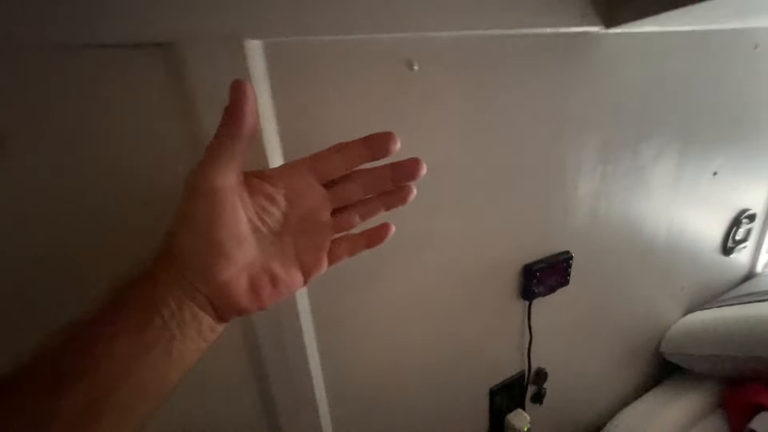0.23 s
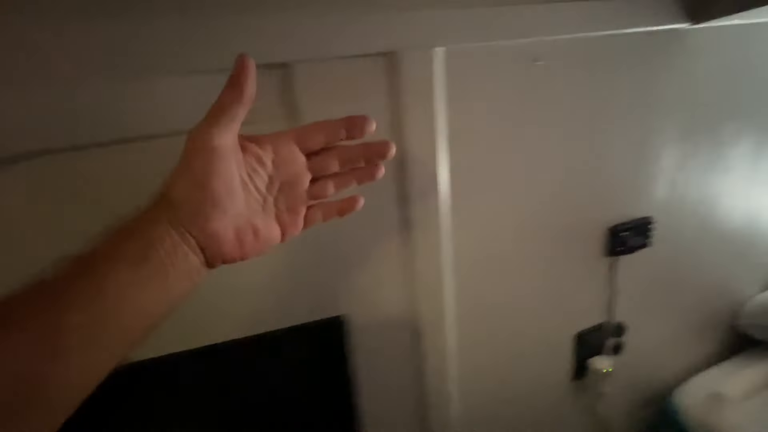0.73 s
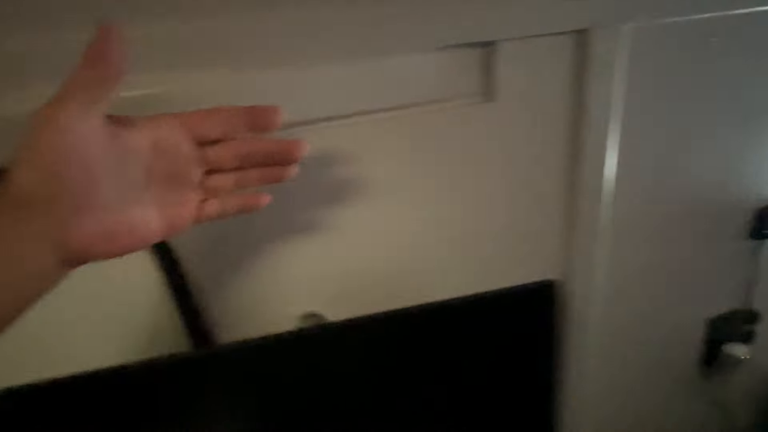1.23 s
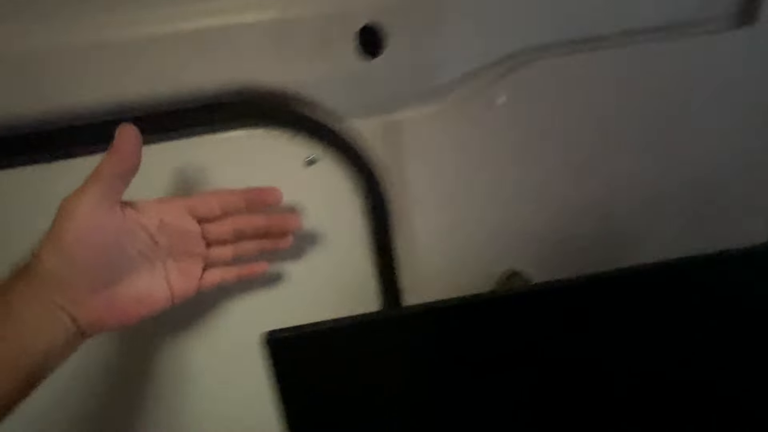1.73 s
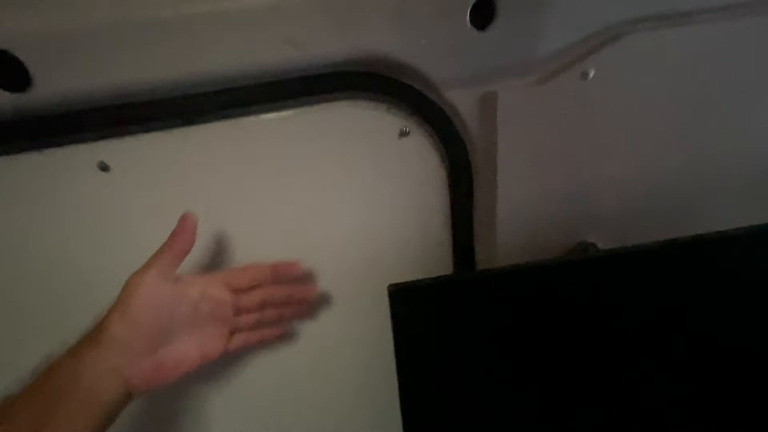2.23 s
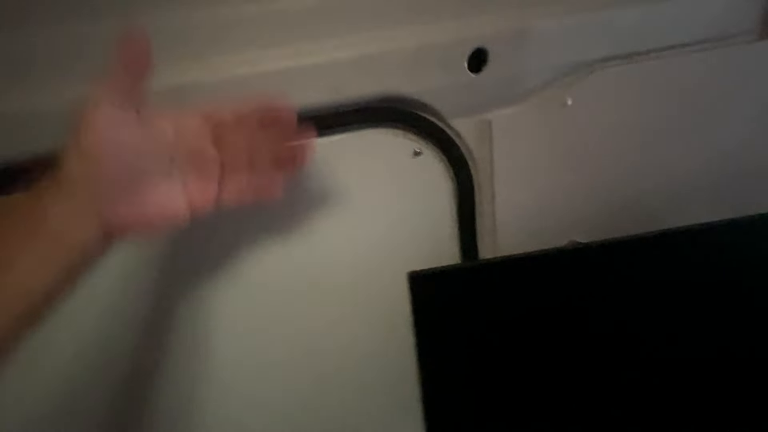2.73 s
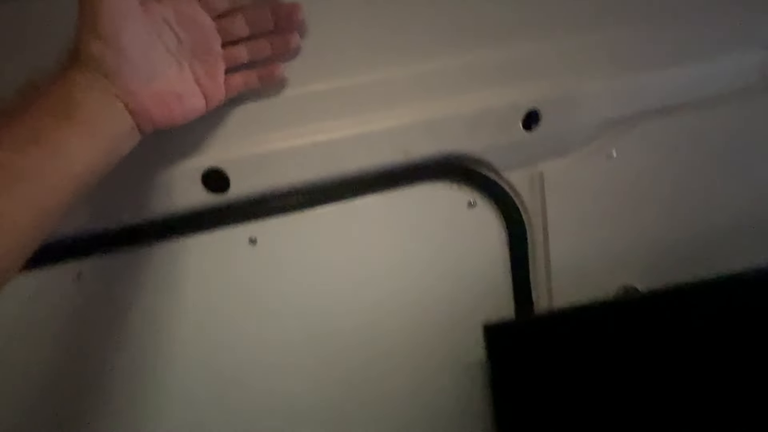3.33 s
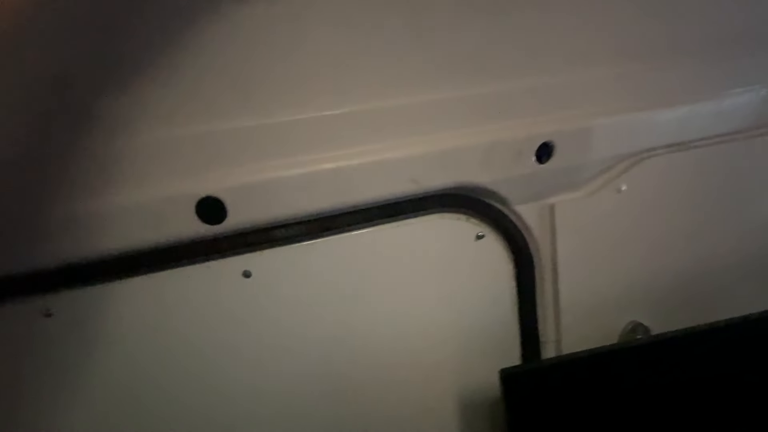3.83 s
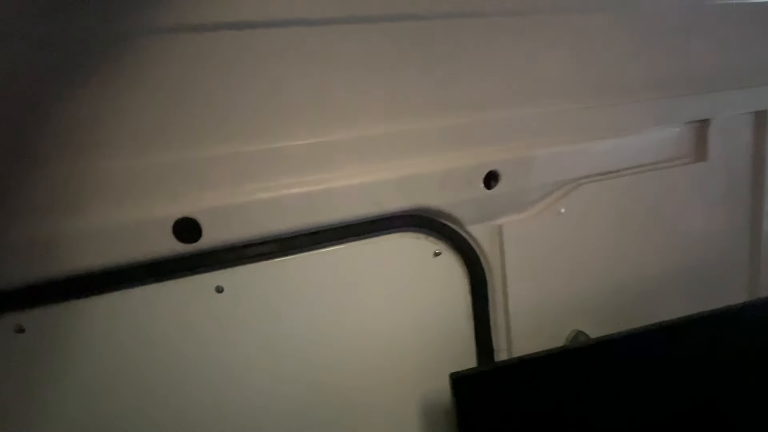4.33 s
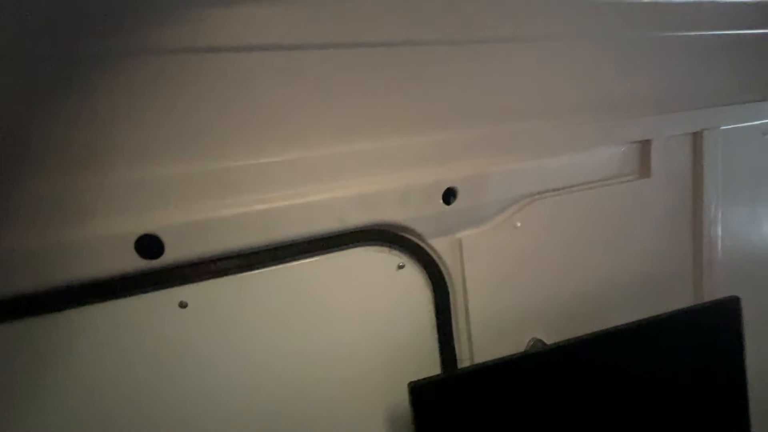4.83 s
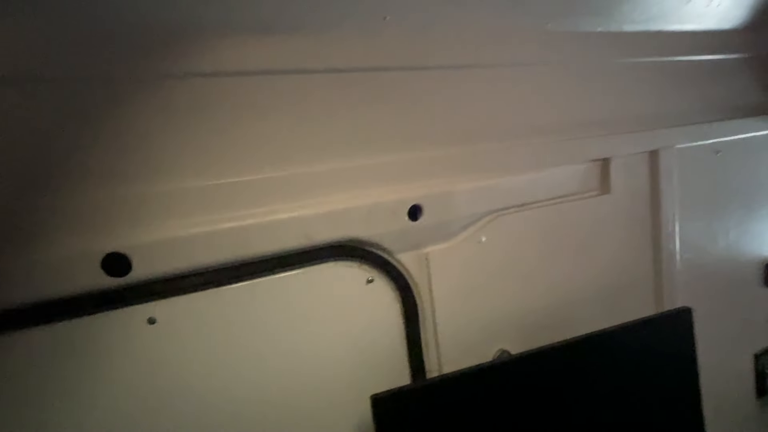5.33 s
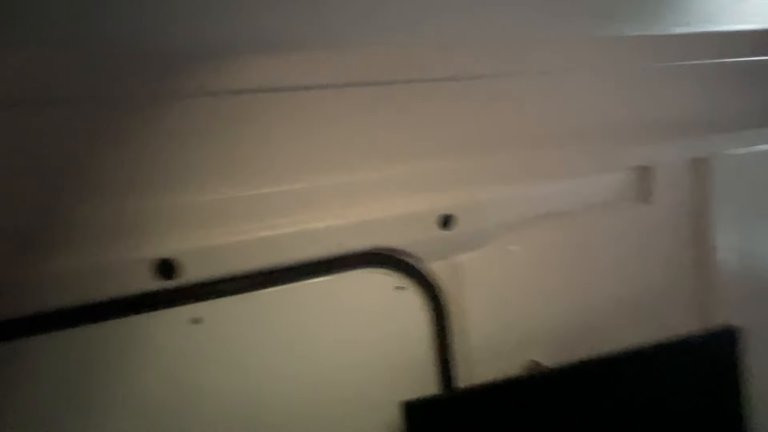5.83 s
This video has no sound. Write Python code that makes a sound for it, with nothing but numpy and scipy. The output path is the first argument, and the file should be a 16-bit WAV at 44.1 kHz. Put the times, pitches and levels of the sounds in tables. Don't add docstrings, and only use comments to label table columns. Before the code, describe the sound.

A compressor thumps in a deep, fast, wavering hum while a fan blows steady air inside a small sheet-metal cabin, with faint sleeve rustles.

```python
import sys
import numpy as np
from scipy import signal
from scipy.fft import rfft, irfft, next_fast_len
from scipy.io import wavfile

SR = 44100
rng = np.random.default_rng(int(sys.argv[2]) if len(sys.argv) > 2 else 0)


def wav_out(sig):
    wavfile.write(sys.argv[1], SR, np.round(np.clip(np.atleast_2d(sig).T, -1, 1) * 32767).astype(np.int16))


def nominal_scale(level):
    x = np.asarray(level, float) / 20
    return 10 ** x


N = 267598
TIME_S = np.arange(N) / SR
SIDES = np.array([[1], [-1]])

# frequency in Hz, left minus right in dB.
LEAN_DB = [(50, 9), (90, -4), (170, 3), (250, 13), (450, 1.5), (720, 2.5), (1500, 1), (2200, 0.5),
           (3000, 4), (4200, 2.5), (5200, 10), (7500, 5.5), (8800, 1.5), (12000, 1)]


def rms_one(x):
    return x / np.sqrt(np.mean(x ** 2) + 1e-20)


def in_time(rows):
    s, *columns = np.transpose(rows)
    return [np.interp(TIME_S, s, c) for c in columns]


def at_hz(points, hz):
    points_hz, values = np.array(points).T
    return np.interp(np.log(hz), np.log(points_hz), values)


def drift(rate_hz):
    r = np.exp(-80 * np.pi * rate_hz / SR)
    white = rng.standard_normal(N // 40 + 2002)
    slow = signal.lfilter([1], [1, -2 * r, r * r], white)[2000:]
    return np.interp(np.arange(N) / 40, np.arange(len(slow)), rms_one(slow))


def resonate(x, hz, width_hz):
    r = np.exp(-np.pi * width_hz / SR)
    return signal.lfilter([1, 0, -1], [1, -2 * r * np.cos(2 * np.pi * hz / SR), r * r], x)


def by_place(levels_db, swing, back, flip=1):
    start, away, end = nominal_scale(np.array(levels_db))
    return (1 - swing) * start + swing * ((1 - back) * away + flip * back * end)


def cabin_noise():
    places_s = [0, .7, 1.2, 1.6, 2.1, 2.9, 3.8, 4.6, 5.4, 6.07]
    t60_s = 0.15
    out = np.zeros((2, N))
    age_s = np.arange(SR // 4) / SR
    for near in np.eye(len(places_s)):
        weight = np.sqrt(np.interp(TIME_S, places_s, near))
        span = np.flatnonzero(weight)
        echoes = rng.standard_normal((2, len(age_s))) * nominal_scale(-60 * age_s / t60_s)
        echoes /= np.linalg.norm(echoes, axis=1, keepdims=True)
        source = rng.standard_normal((1, len(span) + len(age_s) - 1))
        out[:, span] += weight[span] * signal.fftconvolve(source, echoes, "valid", axes=1)
    return out


def stereo_noise(spectrum, boxed=False):
    # frequency in Hz, power share 0-1.
    cabin_share = [(200, 0.22), (400, 0.43), (1500, 1), (3000, 0.6), (6000, 0.55), (12000, .3)]
    # frequency in Hz, left-right likeness.
    likeness = [(60, 14), (200, 1.2), (310, -0.5), (460, -0.3), (700, -0.07), (2400, 0), (8000, 0)]
    # frequency in Hz, likeness.
    port_likeness = [(9500, -.2), (9750, -.93), (10400, -.94), (11000, -.35), (11600, .85), (12200, .9),
                     (12900, -.3), (13800, -.9), (14900, .6)]
    size = next_fast_len(N)
    hz = np.maximum(np.fft.rfftfreq(size, 1 / SR), 1)
    left, right = rfft(rng.standard_normal((2, N)), size)
    if boxed:
        share = np.clip(at_hz(cabin_share, hz), 0, 1)
        echoed = rfft(cabin_noise(), size)
        left, right = np.sqrt(1 - share) * [left, right] + np.sqrt(share) * echoed
    alike = np.clip(at_hz(likeness + port_likeness, hz), -1, 1)
    pair = np.sqrt(1 + alike) * (left + right) + np.sqrt(1 - alike) * (left - right) * SIDES
    inside = (hz > spectrum[0][0] / 2) & (hz < spectrum[-1][0] * 1.05)
    colour = nominal_scale(at_hz(spectrum, hz) + SIDES * at_hz(LEAN_DB, hz) / 2)
    return rms_one(irfft(pair * inside * colour, size)[:, :N])


def buffeting():
    # time in seconds, lift in dB.
    buffets = [(.25, 3), (.83, 3.5), (1.39, -6), (1.5, 5.5), (1.66, -15), (1.89, 6.5), (2.16, 3),
               (2.6, -17), (2.92, -11), (3.01, 5), (3.16, 3), (3.33, -11), (3.52, 10.5), (3.65, -11),
               (3.77, 6), (3.92, 9.5), (4.28, -1), (4.41, -16), (4.67, 8), (4.97, 5.5), (5.44, 3),
               (5.8, -15), (5.87, 6)]
    swell_s, choke_s = 0.068, 0.045
    coarse_s = np.arange(0, N, 40) / SR
    s, lift_db = np.transpose(buffets)
    half_s = np.where(lift_db > 0, swell_s, choke_s)
    bells = np.exp(-((coarse_s[:, None] - s) / half_s) ** 2)
    return np.interp(TIME_S, coarse_s, bells @ lift_db)


def compressor(swing, back):
    # shaft order, left and right in dB before the swing, left and right in dB after it.
    orders = [(2, -27.5, -25, -35.5, -37), (3, -39, -37, -27, -28.5), (4, -36.5, -30, -49, -42.5),
              (5, -59, -75, -40, -39), (6, -27.5, -31.5, -35.5, -31), (7, -28.5, -53, -34.5, -27.5),
              (8, -42.5, -70, -37, -32.5), (9, -35, -34, -41.5, -52.5), (10, -64, -75, -45.5, -61),
              (11, -43, -44.5, -43, -38.5), (12, -63, -49, -60, -61), (13, -61, -52, -76, -75),
              (14, -67, -69, -61, -56.5), (15, -78, -65, -77, -50), (16, -75, -55, -57, -53.5),
              (17, -58, -48, -69, -56), (18, -58, -56.5, -70, -55.5), (19, -55, -60, -72, -71)]
    floor_path = [(4.6, 1.5), (5.9, -1.65)]
    air_path = [(3.15, 0.0), (3.6, -2.75)]
    turns_hz, start_rad = 24.249, -0.07
    past_node, behind = (9, 10, 11), (4, 5, 11)
    turn = 2 * np.pi * turns_hz * TIME_S + start_rad + 0.08 * drift(0.69)
    lift_db = buffeting()
    boom_db = {2: lift_db + 3.5 * back, 3: 0.11 * lift_db + 1.6 * back}
    thud_db = -1.12 + 4 * np.exp(-((swing - 0.68) / 0.18) ** 2)
    out = np.zeros((2, N))
    for k, *levels_db in [(1, -54, -54, -51, -51), *orders]:
        start, end = np.array(floor_path if k < 5.5 else air_path) @ [k, 1]
        before, after = nominal_scale(np.reshape(levels_db, (2, 2, 1)))
        gain = (1 - swing) * before + swing * after * (-1 if k in past_node else 1)
        gain = gain * (-1 if k in behind else 1)
        if k in boom_db:
            gain = gain * nominal_scale(boom_db[k])
        else:
            gain = gain * nominal_scale(0.84 * drift(1.7) + thud_db * (k > 5.5))
        spacing_rad = 0.17 * SIDES * (1 if k == 3 else -1)
        out += np.sqrt(2) * gain * np.cos(k * turn + start + swing * (end - start) + spacing_rad)
    return out


def tones(swing):
    tones_hz = (57.6, 60.0, 104.3, 208.5, 711, 749, 864.5, 2997)
    # left in dB, right in dB, gain along the swing in dB, wobble in dB.
    tone_levels = [(-61, -48, -6, 13), (-50, -45, -2, 3), (-44, -55, 4.5, 4), (-90, -54.5, 2, 5),
                   (-65, -65.5, 5.5, 6), (-66, -93, -2, 0), (-60, -58, -5, 7.5), (-72, -74, -8, 2)]
    # left, right, gain along the swing, wobble, all in dB.
    whine_levels = (-58, -59, -1, 1.5)
    mains_hz, mains_rad, whine_hz = 120.02, 3.4, 3055
    mains_db = np.array([[-43], [-43.5]])
    out = np.sqrt(2) * nominal_scale(mains_db) * np.cos(2 * np.pi * mains_hz * TIME_S + mains_rad)
    rows = zip([*tones_hz, whine_hz], [*tone_levels, whine_levels])
    for hz, (left_db, right_db, gain_db, wobble_db) in rows:
        phase = 2 * np.pi * hz * TIME_S + hz / 4000 * drift(2.7)
        for side, level_db in enumerate((left_db, right_db)):
            height = nominal_scale(level_db + gain_db * swing + wobble_db * drift(3.5))
            out[side] += np.sqrt(2) * height * np.cos(phase + side * np.pi / 2)
    return out


def blades(swing, back):
    # level in dB at the start, after the swing, after turning back.
    blade_levels = [
        (-56, -48.5, -47),
        (-57.5, -47, -48.5),
    ]
    blade_hz = 391.0
    phase = 2 * np.pi * blade_hz * TIME_S + 0.18 * drift(3.3)
    apart_rad = np.array([[0], [np.pi / 2]])
    out = np.zeros((2, N))
    for k, levels_db in enumerate(blade_levels, 1):
        height = by_place(levels_db, swing ** 2, back, flip=-1.02) * nominal_scale(4 + 2.4 * drift(4.9))
        out += height * np.cos(k * phase + apart_rad)
    return out


def duct(swing, back):
    # frequency in Hz, width in Hz, dB at the start, after the swing, after turning back.
    duct_modes = [(370.7, 38.4, -49, -54, -52), (448, 16, -54, -49, -60.5), (521, 13.6, -52, -52, -55),
                  (735, 64, -52.5, -55, -48.5), (1016, 370, -44.5, -46.5, -68),
                  (1584, 320, -50, -62, -47.5), (2986, 200, -69, -77, -61.5), (4970, 850, -79, -82, -71)]
    blown = rng.standard_normal((2, N))
    blown[1] = 0.6 * blown[1] + 0.8 * np.roll(blown[0], 16)
    out = np.zeros((2, N))
    for hz, width_hz, *levels_db in duct_modes:
        lean = nominal_scale(at_hz(LEAN_DB, hz) / 2 * SIDES)
        sung = rms_one(resonate(resonate(blown, hz, width_hz * 1.34), hz, width_hz * 1.34))
        out += by_place(levels_db, swing, back) * nominal_scale(1.4 * drift(3.7)) * lean * sung
    return out


def airflow(swing, back):
    # frequency in Hz, density in dB per Hz.
    rush_colour = [(300, -16), (450, 2), (590, -0.5), (720, 3.5), (950, -1.5), (1400, -2), (1850, -6.5),
                   (2300, -12), (3000, -11), (4300, -17.5), (5200, -18.5), (8200, -21), (10500, -27.5),
                   (12500, -36)]
    # frequency in Hz, density in dB per Hz.
    rumble_colour = [(30, -26), (40, -8), (52, -4), (70, 3), (95, -7.5), (140, -5.5), (210, -4),
                     (245, -1.5), (280, -15.5), (330, -9.5)]
    hiss_colour = [(10200, -12), (10700, 5), (11600, 5.5), (12300, -9),
                   (12900, -10), (13400, -19), (14000, -13), (15000, 1)]
    rush_db = -38.5 + 1.1 * back + 0.51 * drift(10.0)
    hiss_db = -67.5 + 2.9 * (swing + back - 1) + 4.5 * drift(9.8)
    rumble_db = -36 + 2.6 * (swing - 1)
    rush = nominal_scale(rush_db) * stereo_noise(rush_colour, boxed=True)
    hiss = nominal_scale(hiss_db) * stereo_noise(hiss_colour)
    rumble = nominal_scale(rumble_db) * stereo_noise(rumble_colour)
    return rush + duct(swing, back) + hiss + rumble


def squeak():
    hz, width_hz, level_db, fade_s = 4414, 120, -65, -1.4
    fade = 1 / (1 + (TIME_S / fade_s) ** 4)
    thin = resonate(resonate(rng.standard_normal(N), hz, width_hz), hz, width_hz)
    return nominal_scale(level_db) * fade * rms_one(thin) * nominal_scale(np.array([[-9], [0]]))


def sleeve():
    # peak time in seconds, peak in dB, length in seconds, centre in Hz.
    rustles = [(0.64, -51, 0.16, 10000), (0.806, -51, 0.074, 10000), (0.853, -44.5, 0.077, 8300),
               (1.139, -40, 0.078, 8100), (1.73, -49, .075, 9500), (2.386, -43.5, .046, 5530),
               (2.63, -45, .041, 7760), (2.98, -46, .044, 10000), (3.205, -45.5, 0.13, 7500),
               (3.483, -52.5, 0.12, 10000), (4.397, -55, 0.15, 10500), (4.965, -52, 0.1, 11000),
               (5.567, -49, 0.061, 7000), (6.07, -43, 0.47, 7040)]
    snag = (1.14, -46, 0.075, 4700, 0.22)
    rise_share, width_share = 0.39, 1.8
    edge = 1.9
    cloth = stereo_noise([(2500, 22), (4300, 9.5), (9000, 5.0), (11000, 4.5), (12500, -12)])
    grain_db = 2.6 * drift(160.0)
    out = np.zeros((2, N))
    for s, peak_db, length_s, hz, share in [*[(*row, width_share) for row in rustles], snag]:
        rise_s, fall_s, width_hz = rise_share * length_s, (1 - rise_share) * length_s, share * hz
        span = slice(max(int((s - 4 * rise_s) * SR), 0), int((s + 6 * fall_s) * SR))
        late_s = TIME_S[span] - s
        shape = np.exp(-np.where(late_s < 0, -late_s / rise_s, late_s / fall_s) ** edge)
        rubbed = resonate(resonate(cloth[:, span], hz, width_hz), hz, width_hz * 0.91)
        out[:, span] += nominal_scale(peak_db + grain_db[span]) * shape * rms_one(rubbed)
    return out


def scene():
    # time in seconds, swing away 0-1, turn back 0-1.
    motion = [
        (0, 0, 0),
        (.45, 0.11, 0),
        (.9, 0.3, 0),
        (1.5, 0.77, 0.12),
        (2.2, 0.97, 0.06),
        (3.2, 1, 0.07),
        (4.3, 0.96, 0.83),
        (6.07, 0.91, 1),
    ]
    swing, back = np.clip(in_time(motion), 0, 1)
    machine = compressor(swing, back) + tones(swing) + blades(swing, back)
    return machine + airflow(swing, back) + squeak() + sleeve()


def band_limit(x):
    return signal.sosfilt(signal.butter(12, 15200, fs=SR, output="sos"), x)


def record(dry):
    low_pass = signal.cheby2(10, 60, 15600, fs=SR, output="sos")
    mix = signal.sosfilt(low_pass, dry)
    return band_limit(mix)


dry = scene()
out = record(dry)
wav_out(out)
```